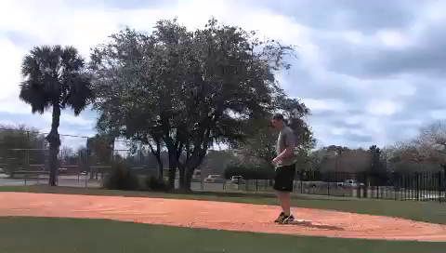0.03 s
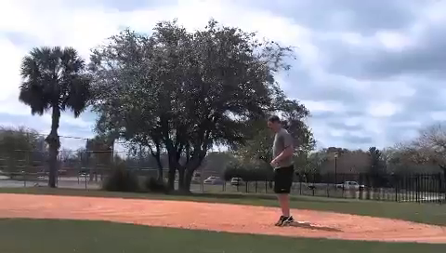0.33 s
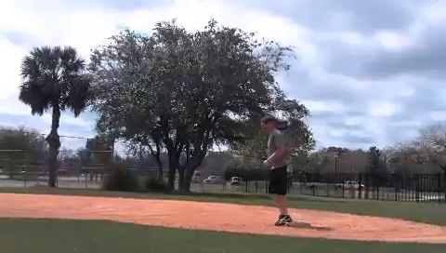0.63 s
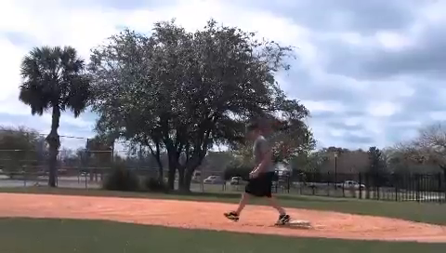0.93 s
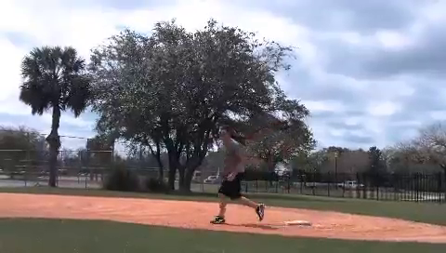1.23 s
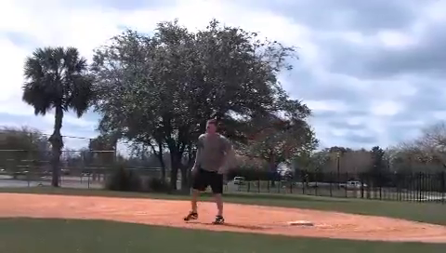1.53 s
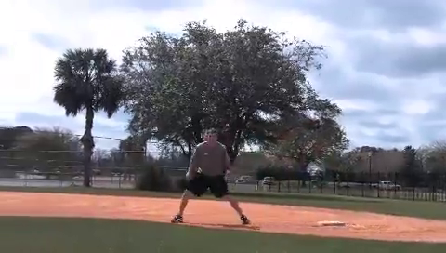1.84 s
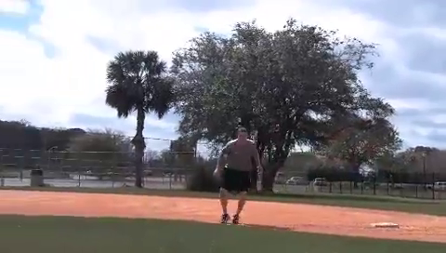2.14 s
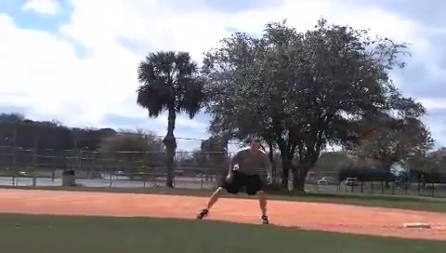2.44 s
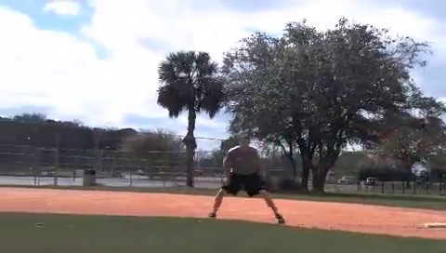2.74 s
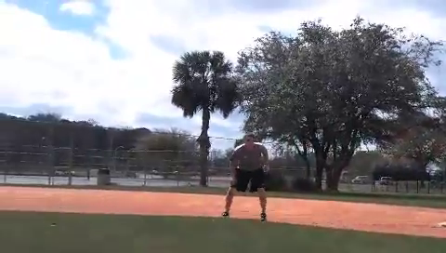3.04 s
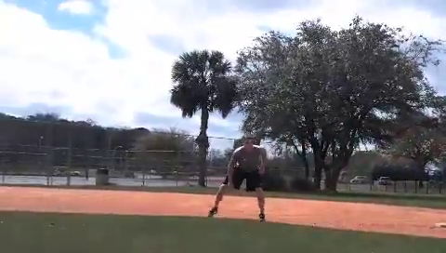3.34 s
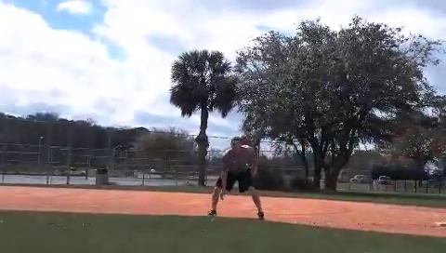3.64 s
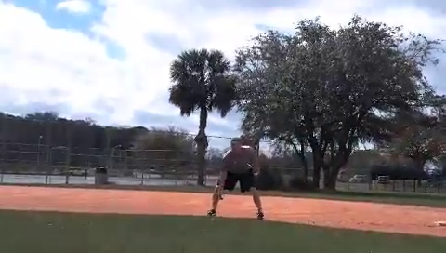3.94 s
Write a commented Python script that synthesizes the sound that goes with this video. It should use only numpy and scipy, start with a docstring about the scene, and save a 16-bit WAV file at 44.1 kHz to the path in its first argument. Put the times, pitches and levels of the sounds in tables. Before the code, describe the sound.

Birds call repeatedly outdoors, with low wind, close handling knocks and faint steps on dirt.

```python
"""A dirt field ringed by trees, heard in mono from the microphone of a hand-panned camera.
Birds in the trees whistle, slur, chip, buzz and warble, each note one gliding tone with a faint echo.
Wind rumbles on the microphone over distant outdoor noise, and a few steps scuff the dirt.
Closest of all, the camera's motor hums faintly and its body bumps, knocks and clicks as it is panned."""
import sys
import numpy as np
from scipy import signal
from scipy.fft import rfft, irfft
from scipy.io import wavfile

SR = 44100
rng = np.random.default_rng(int(sys.argv[2]) if len(sys.argv) > 2 else 0)


def output_pcm(signal):
    """Save a mono or channel-first signal as 16-bit PCM at the path in sys.argv[1].

    Samples are clipped to [-1, 1] before scaling.
    """
    pcm = np.clip(np.atleast_2d(signal).T, -1, 1) * 32767
    wavfile.write(sys.argv[1], SR, np.round(pcm).astype(np.int16))


N = 176400
T = np.arange(N) / SR
FREQS = np.fft.rfftfreq(N, 1 / SR)


def amp(db):
    """Decibels to gain."""
    return 10 ** (np.asarray(db) / 20)


def unit(x):
    """Scales to rms 1."""
    return x / np.sqrt(np.mean(x ** 2) + 1e-20)


def curve(points, t):
    """Joins (time, value) points by straight lines."""
    return np.interp(t, *np.transpose(points))


def colour(x, spectrum):
    """Filters by (frequency [Hz], level [dB]) points and scales to rms 1."""
    f, db = np.transpose(spectrum)
    hz = np.fft.rfftfreq(len(x), 1 / SR)
    gain = amp(np.interp(np.log(hz + 1), np.log(f), db))
    return unit(irfft(rfft(x) * gain, len(x)))


def noise(spectrum, n=N):
    """Coloured noise of rms 1."""
    return colour(rng.standard_normal(n), spectrum)


def drift(rate_hz):
    """Slow random wander of rms 1."""
    return unit(irfft(rfft(rng.standard_normal(N)) * np.exp(-(FREQS / rate_hz) ** 2), N))


def add(mix, start, sound):
    """Mixes a sound in at start seconds."""
    part = mix[max(round(start * SR), 0):][:len(sound)]
    part += sound[:len(part)]


# wind right on the microphone (frequency [Hz], level [dB])
WIND_SPECTRUM = [(4, -18), (14, -1), (30, 0), (50, 0), (85, -2), (125, -9), (170, -16), (220, -24),
                 (300, -30), (400, -42), (700, -62), (2000, -90)]
# its rise and fall (time [s], level [dB])
WIND_LEVEL = [(.1, -38), (.33, -34), (.55, -36.5), (.9, -33), (1.2, -30.5), (1.55, -32), (1.85, -38.5),
              (2.4, -38), (3.1, -40), (4, -40.5)]

def wind():
    """Wind buffets the microphone in low, lumpy gusts."""
    gusts_db = 2.4 * drift(16)
    return noise(WIND_SPECTRUM) * amp(curve(WIND_LEVEL, T) + gusts_db)


# rumble from far off (frequency [Hz], level [dB])
RUMBLE_SPECTRUM = [(20, -1), (90, 0.5), (160, -2.5), (220, -11), (300, -12), (400, -18.5), (700, -34),
                   (2000, -67)]

def far_rumble():
    """A low rumble wavers about a steady level."""
    return noise(RUMBLE_SPECTRUM) * amp(-45 + 2.5 * drift(16))


# distant outdoor noise and microphone hiss (frequency [Hz], level [dB])
AIR_SPECTRUM = [(100, -2.5), (350, 1.5), (600, 1), (1000, 2), (1500, 0), (2000, -2), (3200, -2.5),
                (4800, -5.5), (6000, -10.5), (6800, -14), (7400, -30), (8500, -31.5), (9700, -20.5),
                (12000, -18), (15000, -20.5)]

def open_air():
    """A smooth, almost even bed of noise."""
    return noise(AIR_SPECTRUM) * amp(-56 + .5 * drift(7.2))


# motor lines, right beside the microphone (frequency [Hz], level [dB])
MOTOR_LINES = [(73.8, -36.7), (120, -51), (151, -52), (174, -55), (240, -63), (1066, -77), (4733, -81),
               (6595, -83), (11326, -92), (12710, -91), (14567, -92)]
# electrical buzz in the camera (frequency [Hz], level [dB])
TICK_SPECTRUM = [(1000, -14), (5000, 3.5), (7500, -3), (8500, -3.5), (10000, -21.5), (15000, -26.5)]

def camera_hum(tick_hz=59.94):
    """The motor's low hum drifts in pitch under a fixed whine; fast electrical ticks buzz faintly."""
    motor_time = np.cumsum(1 + .005 * drift(3.64)) / SR
    hum = np.zeros(N)
    for hz, db in MOTOR_LINES:
        gain = np.sqrt(2) * amp(db + 1.6 * drift(18))
        cycles = hz * (motor_time if hz < 1000 else T)
        hum += gain * np.sin(2 * np.pi * (cycles + rng.random()))
    ticks = np.diff(np.floor(T * tick_hz), prepend=0)
    return hum + amp(-76.5) * colour(ticks, TICK_SPECTRUM)


# a soft rush in the background (frequency [Hz], level [dB])
RUSH_SPECTRUM = [(200, -7), (650, 5), (1000, -4.5), (1500, 6), (2000, -5.5), (4000, -15.5), (9000, -66)]
# its rise and fall (time [s], level [dB])
RUSH_LEVEL = [(.1, -58.5), (.17, -50.5), (.27, -51), (.4, -59.5), (.7, -92), (1.1, -93)]

def rush():
    """Midrange noise rises briefly at the start and dies away."""
    return noise(RUSH_SPECTRUM) * amp(curve(RUSH_LEVEL, T))


# unsteadiness of the birds' voices, as factors on pitch and level
PITCH_WAVER, LEVEL_FLUTTER = 1 + .0052 * drift(120), amp(drift(41))
PITCH_JITTER = 1 + .0354 * drift(500)

def sing(mix, start, hz, db, rise_s=.0031, fall_s=.0067):
    """Adds one bird note: a near-pure tone on a pitch curve, with a quick rise and fall."""
    t = np.arange(len(hz)) / SR
    at = (round(start * SR) + np.arange(len(hz))) % N
    ramp = np.clip(np.minimum(t / rise_s, (t[-1] - t) / fall_s), 0, 1)
    tone = np.sqrt(2) * np.sin(2 * np.pi * np.cumsum(hz * PITCH_WAVER[at]) / SR)
    add(mix, start, amp(db) * np.sin(np.pi / 2 * ramp) * LEVEL_FLUTTER[at] * tone)


# held whistles from the trees
# (time [s], length [s], first pitch [Hz], last pitch [Hz], level [dB], flick height [Hz])
WHISTLES = [(.152, 0.022, 3130, 3340, -51.5, 11), (.255, 0.045, 2390, 2530, -56, -9),
            (.302, 0.2, 3376, 3476, -49.5, 0), (.33, 0.26, 2620, 2734, -56, -8),
            (.626, 0.15, 3200, 3560, -45, 215), (1.11, 0.039, 2900, 2860, -62, 0.5),
            (1.157, 0.043, 2526, 2520, -57.5, 0), (1.212, 0.083, 3410, 3494, -52.5, -5),
            (1.286, 0.14, 3510, 3506, -58.5, 3), (1.81, 0.053, 2715, 2920, -57, 2),
            (1.862, 0.042, 2510, 2530, -58.5, 0), (1.908, 0.1, 3356, 3480, -51, -11),
            (1.988, .108, 3490, 3485, -43.5, 0), (2.369, .156, 3450, 3550, -44, 380),
            (2.452, .065, 3150, 3250, -56, 0), (2.542, 0.033, 2516, 2640, -55, 8),
            (2.625, 0.086, 2785, 2880, -56.5, 12), (3.455, 0.038, 3120, 3100, -62, 4),
            (3.675, 0.14, 3290, 3535, -46.5, 257)]

def whistles(flick_rate_hz=82):
    """A bird's pitch glides and levels off, with sharp little flicks on some notes."""
    out = np.zeros(N)
    for start, length, first, last, db, flick_hz in WHISTLES:
        t = np.arange(0, length, 1 / SR)
        progress = t / length
        glide = last + (first - last) * (1 - progress) ** 1.5
        flicks = abs(np.cos(np.pi * flick_rate_hz * t)) ** 44 * np.sin(np.pi * progress) ** .5
        sing(out, start, glide + flick_hz * flicks, db - 4.5 * (2 * progress - 1) ** 2)
    return out


def tree_echo(song, t60_s=.45, scatter_s=.024):
    """The song arrives with quick scatter from nearby branches and a faint echo from the trees."""
    t = T[:SR]
    tail = rng.standard_normal(SR) * amp(-60 * t / t60_s) * np.minimum(t / .042, 1)
    scatter = rng.standard_normal(SR) * np.exp(-t / scatter_s)
    response = amp(-18) * tail / np.linalg.norm(tail) + amp(-20) * scatter / np.linalg.norm(scatter)
    return song + signal.fftconvolve(song, response)[:N]


# slurred notes from the trees
# (time [s], length [s], first pitch [Hz], last pitch [Hz], level [dB], settling rate [per note])
SLURS = [(.162, 0.043, 3440, 2320, -47, 6.9), (0.478, 0.033, 3510, 2430, -47.5, 3.4),
         (0.501, 0.027, 2590, 3570, -48.5, 0.36), (.516, 0.053, 3380, 2375, -47.5, 6.3),
         (1.027, 0.014, 2980, 3610, -58, 0.23), (1.346, 0.036, 3540, 2550, -55, 2.2),
         (1.386, 0.058, 2500, 2250, -59.5, 1.3), (1.537, 0.036, 3400, 2900, -59, .8),
         (2.089, 0.047, 3360, 2566, -46, 1.8), (2.255, 0.027, 4600, 3330, -60, 0.25),
         (2.377, 0.052, 3150, 2200, -56.5, 2.6), (2.493, 0.013, 5250, 4560, -58, .3),
         (2.565, 0.023, 3370, 5280, -57, .3), (2.575, 0.054, 3170, 2680, -46.5, 1.65),
         (2.679, 0.011, 2740, 3400, -46.5, .3), (2.69, .044, 3510, 2350, -51, 3.2),
         (3.08, 0.026, 4800, 3320, -65, 0.26), (3.382, 0.042, 5350, 3230, -61, .9),
         (3.754, 0.022, 4250, 5250, -55, .3)]

def slurs():
    """A bird sweeps a slightly rough note along an exponential glide, fading a little."""
    out = np.zeros(N)
    for start, length, first, last, db, settle in SLURS:
        progress = np.arange(0, length, 1 / SR) / length
        glide = first + (last - first) * np.expm1(-settle * progress) / np.expm1(-settle)
        jitter = np.roll(PITCH_JITTER, -round(start * SR))[:len(glide)]
        sing(out, start, glide * jitter, db - 3 * progress ** 2)
    return out


# handling bumps, straight into the microphone (time [s], level [dB], width [s], push [signed factor])
BUMPS = [(0.164, -16.5, 0.0018, 1), (0.945, -24, 0.0017, -2), (1.032, -20, 0.00084, -1),
         (1.0338, -15.5, 0.0014, 1), (1.193, -16, 0.0053, 0.81), (1.295, -24, 0.00083, 0.8),
         (1.395, -18, 0.0013, 1), (1.4, -10, 0.0012, -0.59), (1.449, -27, 0.00075, 1),
         (1.467, -15.5, 0.0025, -1.44), (1.483, -16.5, 0.0018, -0.88), (1.579, -16, 0.0022, -1.32),
         (1.632, -18.5, 0.0019, -0.69), (1.699, -10.5, 0.00095, 0.8), (1.76, -18, .0014, -1.2)]

def bumps(rebound_widths=3):
    """Each dull bump pushes the camera one way, inside a wider, weaker rebound the other way."""
    out, t = np.zeros(N), T[:SR // 10]
    centre = t[-1] / 2
    for time, db, width, strength in BUMPS:
        offset = (t - centre) / width
        push = 1 / np.cosh(np.clip(offset * np.pi / 2, -50, 50))
        rebound = np.exp(-(offset / rebound_widths) ** 2 / 2) / (rebound_widths * np.sqrt(np.pi / 2))
        add(out, time - centre, strength * amp(db) * (push - rebound))
    return out


# shoes on the dirt of the field (time [s], level [dB], decay [s])
SCUFFS = [(0.796, -44, 0.014), (1.665, -56.5, 0.06), (1.709, -43, 0.0089), (1.717, -51.5, .008)]
# dry grit (frequency [Hz], level [dB])
GRIT_SPECTRUM = [(300, -47), (1000, -8.5), (2000, 7), (3000, 11), (4500, -1), (6300, -9.5), (9000, -41),
                 (15000, -22)]

def steps(rise_s=.00034):
    """Grit crunches briefly under a shoe."""
    out, t = np.zeros(N), T[:SR // 5]
    for start, db, decay in SCUFFS:
        grains = rng.standard_normal(len(t)) * amp(2.2 * rng.exponential(1, len(t)).clip(0, 4))
        envelope = np.minimum(t / rise_s, 1) * np.exp(-t / decay)
        add(out, start, amp(db) * colour(grains, GRIT_SPECTRUM) * envelope)
    return out


# thin chips from the trees (time [s], level [dB])
CHIPS = [(0.8, -63.5), (2.542, -59.5), (3.845, -65)]
# the arch of one chip (time [s], pitch [Hz])
CHIP_PITCH = [(0, 6410), (.006, 6600), (.012, 6930), (.036, 6140)]

def chips():
    """A bird's short, high note arches up and falls."""
    out = np.zeros(N)
    arch = curve(CHIP_PITCH, np.arange(0, CHIP_PITCH[-1][0], 1 / SR))
    for start, db in CHIPS:
        sing(out, start, arch, db)
    return out


# knocks on the body that holds the microphone (time [s], level [dB])
KNOCKS = [(1.854, -35.5), (1.946, -33.5), (2.023, -33.5), (2.174, -30.5), (2.787, -29), (2.94, -31.5),
          (3.195, -37.5), (3.323, -33)]
# modes of that body (frequency [Hz], level [dB], time to fall 60 dB [s])
BODY_MODES = [(420, -3.5, 0.084), (446, -5, 0.067), (336, -28, 0.03)]

def knocks(rise_s=.0021):
    """Each knock rings the camera's hollow body, with a faint gritty tick on top."""
    out, t = np.zeros(N), T[:SR // 10]
    modes = sum(amp(db - 60 * t / t60) * np.sin(2 * np.pi * hz * t) for hz, db, t60 in BODY_MODES)
    ring = np.minimum(t / rise_s, 1) * modes
    for start, db in KNOCKS:
        tick = amp(-29) * noise(GRIT_SPECTRUM, len(t)) * np.exp(-t / .0085)
        add(out, start, amp(db) * (ring + tick))
    return out


# faint, high buzzes from the trees (time [s], length [s], level [dB])
BUZZES = [(2.318, 0.092, -65.5), (2.588, .075, -61.5), (2.847, 0.093, -63), (3.144, 0.095, -65.5),
          (3.471, .09, -62), (3.766, 0.062, -64)]

def buzzes(first_hz=4750, last_hz=5510, swing_hz=400, rate_hz=110):
    """A bird swings its rising pitch so fast that the note buzzes."""
    out = np.zeros(N)
    for start, length, db in BUZZES:
        t = np.arange(0, length, 1 / SR)
        glide = first_hz + (last_hz - first_hz) * t / length
        swing = swing_hz * signal.sawtooth(2 * np.pi * rate_hz * t, width=.75)
        sing(out, start, glide + swing, db)
    return out


# a midrange band in the distance (frequency [Hz], level [dB])
SWELL_SPECTRUM = [(500, -28), (1100, -15.5), (1500, 6), (2000, -7), (3500, -31)]
# its rise and fall (time [s], level [dB])
SWELL_LEVEL = [(2.8, -88), (3.15, -66), (3.45, -64.5), (3.8, -86)]

def far_swell():
    """The distant noise swells slightly near the end."""
    return noise(SWELL_SPECTRUM) * amp(curve(SWELL_LEVEL, T))


# casing clicks, right beside the microphone (time [s], level [dB])
CLICKS = [(3.316, -46), (3.3235, -43.5)]
# their colour (frequency [Hz], level [dB])
CLICK_SPECTRUM = [(600, 0), (1100, 13), (1600, -8), (3500, -3), (6300, -2), (9000, -38), (15000, -21)]

def casing_clicks(decay_s=.0034):
    """The camera's casing gives a small double snap."""
    out, t = np.zeros(N), T[:SR // 10]
    for start, db in CLICKS:
        add(out, start, amp(db) * noise(CLICK_SPECTRUM, len(t)) * np.exp(-t / decay_s))
    return out


def warble(start_s=3.491, length_s=.177, rate_hz=49.5, low_hz=2328, swing_hz=970, rasp_hz=480):
    """One bird note dips in scallops, softer at each high cusp; a fast tremble makes it rasp."""
    out, t = np.zeros(N), np.arange(0, length_s, 1 / SR)
    cusp = 1 - np.sin(np.pi * (rate_hz * t % 1) ** .8)
    pitch = (low_hz + swing_hz * cusp) * PITCH_JITTER[:len(t)]
    rasp_cycles = np.cumsum(rasp_hz * (1 + .25 * drift(220)[:len(t)])) / SR
    rasp_db = 20 * np.log10(1 + .45 * np.sin(2 * np.pi * rasp_cycles))
    arch_db = -7 * (2 * t / length_s - 1) ** 2
    sing(out, start_s, pitch, -49 - 7 * cusp + arch_db + rasp_db)
    return out


def scene():
    """The whole field as it reaches the one microphone."""
    birds = tree_echo(whistles() + slurs() + chips() + buzzes() + warble())
    close = steps() + bumps() + knocks() + casing_clicks() + wind() + camera_hum()
    background = far_rumble() + open_air() + rush() + far_swell()
    return (birds + close + background)[None]


# dips in the camera's response (frequency [Hz], width [Hz], gain [dB])
NOTCHES = [(4178, 280, -11.5), (8740, 460, -8.5), (12600, 140, -31)]
# the camera's fade-in, bass side (time [s], gain [dB])
BASS_FADE = [(0, -58), (.075, -61), (.088, -10), (.15, 2)]
# and treble side (time [s], gain [dB])
TREBLE_FADE = [(0, -68), (.085, -49), (.098, -14), (.125, -8), (.16, 0)]

def record(dry, crossover_hz=400, limit_hz=15350):
    """The camera fades in, bass first; its response has narrow dips and a band limit."""
    dips_db = sum(db * np.exp(-((FREQS - hz) / width) ** 2) for hz, width, db in NOTCHES)
    spectrum = rfft(dry) * amp(dips_db)
    bass_share = 1 / (1 + (FREQS / crossover_hz) ** 4)
    bass = irfft(spectrum * bass_share, N) * amp(curve(BASS_FADE, T))
    treble = irfft(spectrum * (1 - bass_share), N) * amp(curve(TREBLE_FADE, T))
    lowpass = signal.firwin(511, limit_hz, window=("kaiser", 9), fs=SR)
    return signal.oaconvolve(bass + treble, lowpass[None], "same")


dry = scene()
out = record(dry)
output_pcm(out)
```